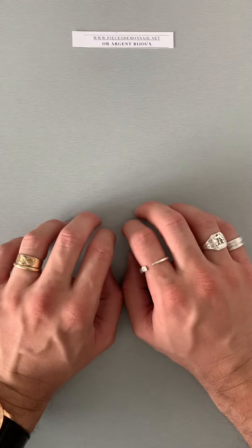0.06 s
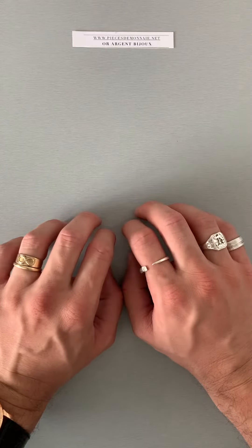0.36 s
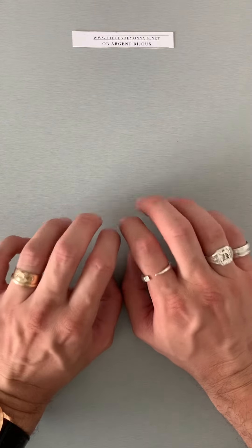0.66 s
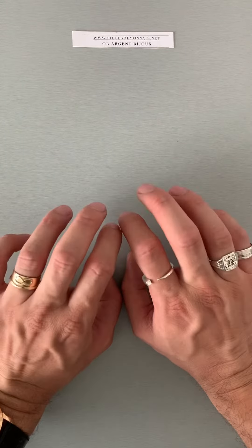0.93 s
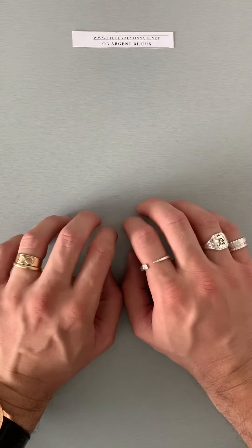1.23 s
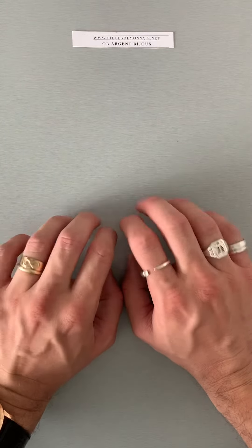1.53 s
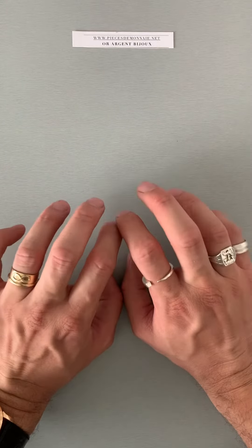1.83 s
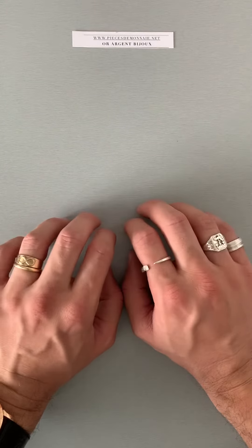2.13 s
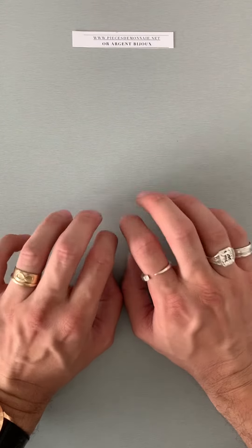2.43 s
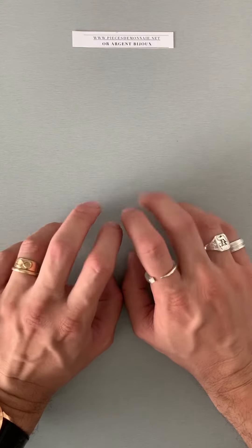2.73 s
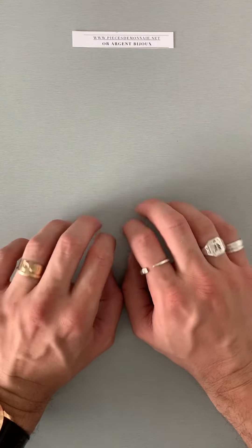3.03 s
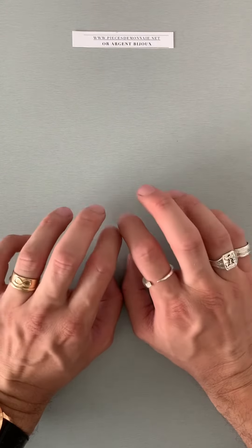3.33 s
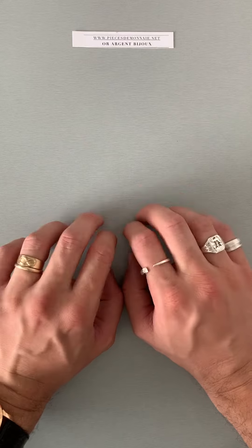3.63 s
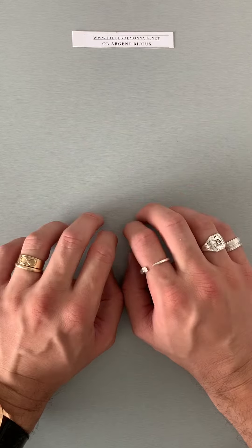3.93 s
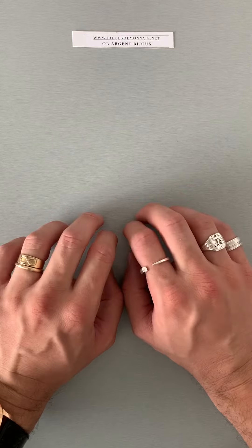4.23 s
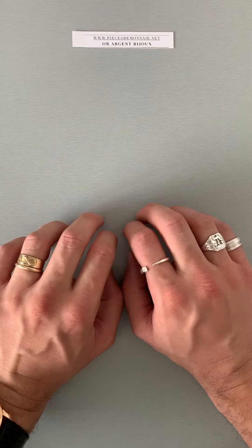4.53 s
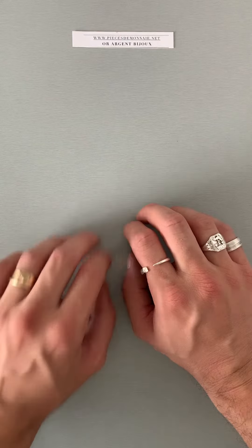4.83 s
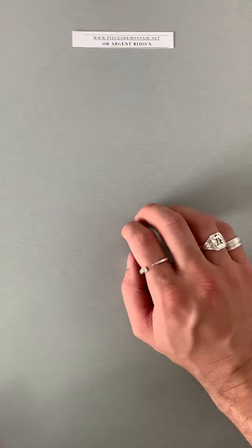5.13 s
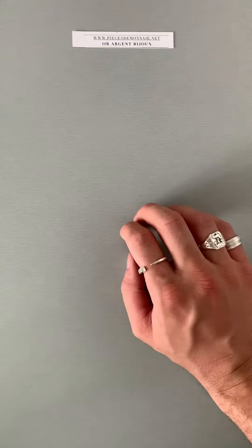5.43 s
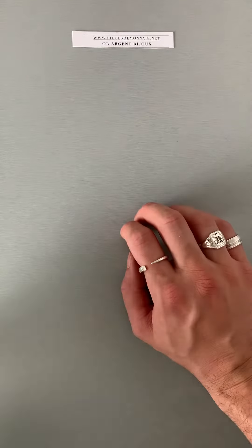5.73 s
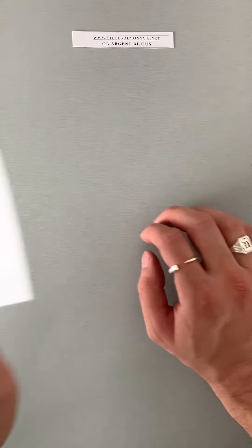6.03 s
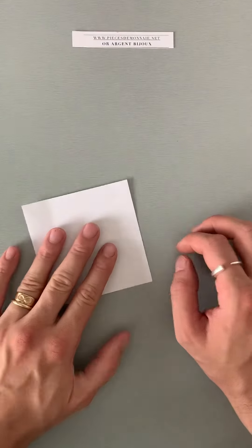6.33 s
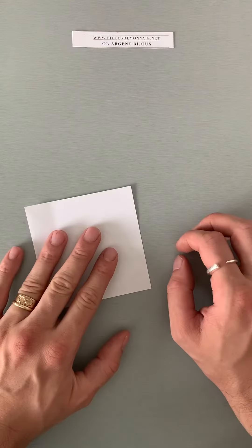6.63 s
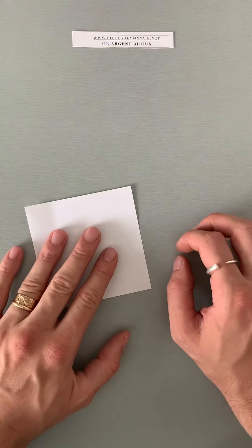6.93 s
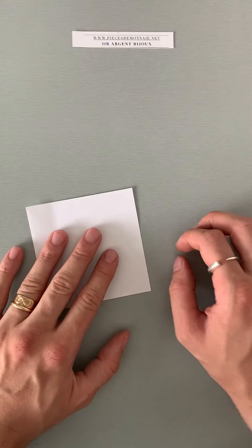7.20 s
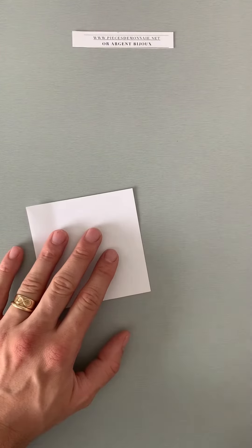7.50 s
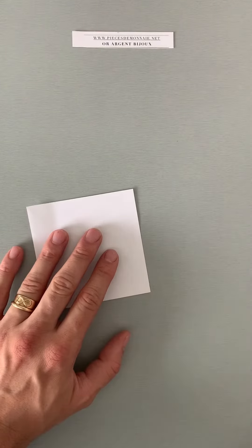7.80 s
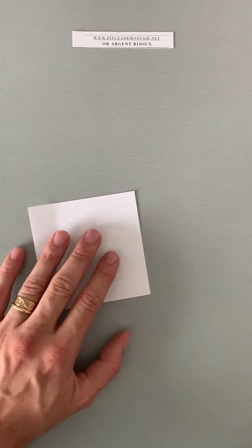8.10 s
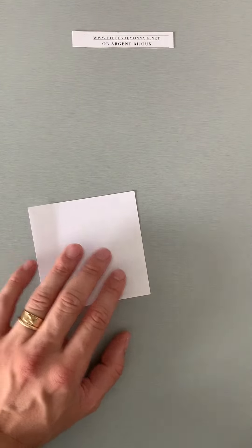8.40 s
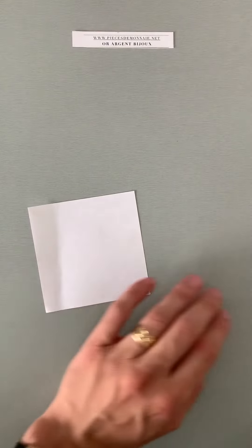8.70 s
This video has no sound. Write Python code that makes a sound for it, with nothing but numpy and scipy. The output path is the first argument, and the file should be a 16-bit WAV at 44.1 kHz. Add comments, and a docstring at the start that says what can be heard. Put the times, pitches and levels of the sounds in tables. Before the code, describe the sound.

Fingers drum on a hard tabletop close to the microphone, in four quick rolls at about 1, 1.9, 2.7 and 3.5 seconds. Each roll has six or seven taps, sharp nail clicks over a hollow thump of the board. A finger ring ticks faintly at 4.7 seconds. Around 5.3 seconds it ticks again as a hand bumps softly, with a small knock and light hissing slides of skin and paper. At 6.2 seconds a paper card is slapped down with a crisp crack and a low thud. Just before 8 seconds there is a short scrape with a few small knocks, then a tiny ring ping, and a hand slides quietly off around 8.5 seconds. The room is small, with a slight echo. A faint appliance hum and distant engines and tyres lie underneath throughout, the traffic stronger in the first half.

```python
"""Fingers of two hands drum four rolls on a tabletop: each nail clicks, then the board thumps.
A paper card hisses aside and is slapped down; there are soft bumps, small knocks and a short scrape,
a finger ring ticks and a hand slides off. The place is a small room with an appliance humming
and engines and tyres in the distance. The two microphone ports are close to the table."""
import sys
import numpy as np
from scipy import signal
from scipy.fft import rfft, irfft, next_fast_len
from scipy.io import wavfile
from scipy.ndimage import uniform_filter1d, map_coordinates

SR = 44100
rng = np.random.default_rng(int(sys.argv[2]) if len(sys.argv) > 2 else 0)


def master(y):
    """Save y as 16-bit WAV."""
    cut = np.clip(np.atleast_2d(y).T, -1, 1)
    pcm = np.round(cut * 32767)  # scale
    wavfile.write(sys.argv[1], SR, pcm.astype(np.int16))


N = 386316
TIME = np.arange(N) / SR
AGE = TIME[:SR // 2]  # seconds since a strike

# swell of the far road: t/s, relative level/dB
ROAD_LEVEL = [(0, -66.5), (0.6, -68), (1.55, -68.5), (2.35, -71), (3.2, -66), (4.0, -72.5), (4.55, -73.5),
              (5.1, -77.5), (6.0, -77), (6.8, -83), (7.5, -80), (8.76, -78.5)]
# bright spectrum of light contact, ticking or sliding: f/Hz, level/dB
CONTACT_COLOUR = [(2500, -18), (4500, -3), (6500, -2.5), (11000, -6), (13000, -3), (15300, -3.5)]


def amp(db):
    """Decibels to gain."""
    return 10 ** (np.asarray(db) / 20)


def unit(x):
    """Scale to rms 1."""
    return x / np.sqrt(np.mean(x ** 2) + 1e-20)


def along(points, hz):
    """Read (f/Hz, value) points on a log frequency axis."""
    freqs, values = np.transpose(points)
    return np.interp(np.log(hz + 1), np.log(freqs + 1), values)


def fade(t60):
    """A decay that loses 60 dB in t60 seconds."""
    return np.exp(-np.log(1000) * AGE / t60)


def gains(rows):
    """A gain curve for each level column of (t/s, level/dB, ...) rows, silent outside them."""
    times, *levels = np.transpose(rows)
    gate = uniform_filter1d(1. * (TIME >= times[0]) * (TIME <= times[-1]), size=512)
    return [amp(np.interp(TIME, times, db)) * gate for db in levels]


def swell(start, hold, attack, release, sag_db_per_s=0):
    """An envelope straight in dB; attack and release are the seconds for 20 dB."""
    age = TIME - start
    edges = np.maximum(-age, 0) / attack + np.maximum(age - hold, 0) / release
    return amp(-20 * np.minimum(edges, 10) - sag_db_per_s * np.clip(age, 0, hold))


def wobble(rate):
    """A smooth random curve, rate knots a second."""
    return map_coordinates(rng.standard_normal(int(N * rate / SR) + 4), [TIME * rate])


def filtered(x, response):
    """Filter x by a response given as a function of frequency."""
    length = x.shape[-1]
    padded = next_fast_len(length + 8192)
    return irfft(rfft(x, padded) * response(np.fft.rfftfreq(padded, 1 / SR)), padded)[..., :length]


def noise(colour, size=N):
    """Coloured noise of rms 1."""
    return unit(filtered(rng.standard_normal(size), lambda hz: amp(along(colour, hz))))


def patchy(colour, depth_db):
    """Noise of rms 1 whose bands swell and fade on their own."""
    bands = signal.stft(noise(colour), nperseg=1024)[2]
    patches = uniform_filter1d(rng.standard_normal(bands.shape), size=6, axis=0)
    patches = uniform_filter1d(patches, size=8, axis=1)
    return unit(signal.istft(bands * amp(depth_db * unit(patches)), nperseg=1024)[1][:N])


def burst(colour, t60, rise):
    """A short dying puff of coloured noise."""
    return noise(colour, size=len(AGE)) * fade(t60) * (1 - np.exp(-AGE / rise))


def struck(modes, rise):
    """Damped modes, struck at slightly new strengths each time."""
    waves = sum(amp(db + rng.standard_normal()) * fade(t60) * np.sin(2 * np.pi * hz * AGE)
                for hz, db, t60 in modes)
    return waves * (1 - np.exp(-AGE / rise))


def add(track, start, sound):
    """Mix a sound into a track, start seconds in."""
    part = track[round(start * SR):][:len(sound)]
    part += sound[:len(part)]


def spread(mid, side):
    """Left and right of a diffuse sound, widest in the midrange."""
    # stereo width: f/Hz, side gain/dB
    width = [(60, -33), (150, -14.5), (300, -8.5), (600, 0.5), (1500, -2.5), (3000, -1.5), (5000, -11.5),
             (15000, -32)]
    side = filtered(side, lambda hz: amp(along(width, hz)))
    return np.array([mid + side, mid - side])


def engine_phase(hz, unsteady=0.0072):
    """The phase of an engine note that wanders a little."""
    return 2 * np.pi * np.cumsum(hz * (1 + unsteady * wobble(5.74))) / SR


def traffic():
    """Far off, engines drone and pull through their gears over the wash of tyres."""
    # droning engine: t/s, f/Hz, fundamental level/dB, octave level/dB
    drone_path = [(0, 57.7, -41, -61), (.22, 56.2, -39.5, -54.5), (.5, 61.67, -53.5, -56.5),
                  (1.15, 59.4, -39, -39.5), (1.75, 60.17, -40.5, -50), (2.05, 60.4, -44, -62)]
    # pulls in gear: t/s, length/s, starting f/Hz, glide/(Hz/s), level/dB
    gears = [(2.12, 0.32, 158.7, 41, -55), (2.9, 0.4, 151.2, 42, -55), (3.49, 0.7, 42.1, -3, -50),
             (8.02, 0.32, 51, 5, -48)]
    # tyres on the road: f/Hz, level/dB
    tyre_colour = [(250, -16), (550, 1.5), (850, 3), (1300, -1), (2000, -16), (3000, -39), (5000, -52)]
    phase = engine_phase(np.interp(TIME, *np.transpose(drone_path)[:2]))
    fundamental, octave = gains(np.delete(drone_path, 1, axis=1))
    engines = fundamental * np.sin(phase) + octave * np.sin(2 * phase)
    for start, length, hz, glide, db in gears:
        pitch = hz + glide * np.clip(TIME - start, 0, length)
        engines += amp(db) * swell(start, length, attack=0.33, release=0.33) * np.sin(engine_phase(pitch))
    tyres = spread(patchy(tyre_colour, depth_db=2.5), noise(tyre_colour))
    return engines + amp(-2.5) * gains(ROAD_LEVEL)[0] * tyres


def room_tone(usual_road_db=-75):
    """Rumble and moving air that swell with the road, an appliance's hum and whine, a faint hiss."""
    # spectra of the rumble, the air and the hiss: f/Hz, level/dB
    rumble_colour = [(20, -38), (30, -22.5), (40, -8.5), (52, 2.5), (66, -4), (82, -8.5), (110, -6.5),
                     (150, -22.5), (220, -39), (440, -88)]
    air_colour = [(76, -27), (130, -0.5), (195, -5.5), (251, -12), (365, -12.5), (398, -11.5), (479, -16),
                  (586, -14), (612, -18), (863, -29), (2000, -33.5), (3400, -44), (5200, -62.5),
                  (8800, -120)]
    hiss_colour = [(1500, -10), (2800, -4), (3250, -3), (3400, 2), (3600, -4), (6000, -4), (14000, -4),
                   (15300, 0), (15800, -5), (16200, -20)]
    # appliance tones: f/Hz, relative level/dB
    hum_tones = [(48.4, -59), (96.9, -52), (333.8, -75.5), (570, -80), (1760, -90), (2080, -96),
                 (3381, -88)]
    road = np.abs(gains(ROAD_LEVEL)[0]) / amp(usual_road_db)
    rumble = amp(-53.5) * road ** 0.6 * spread(noise(rumble_colour), noise(rumble_colour))
    air = amp(-63) * road ** 0.43 * spread(patchy(air_colour, depth_db=4.5), noise(air_colour))
    hum = sum(amp(db + 0.5 + .8 * wobble(2)) * np.sin(2 * np.pi * hz * TIME + 0.099 * wobble(3.1))
              for hz, db in hum_tones)
    return rumble + air + hum + amp(-82.5) * noise(hiss_colour)


def finger_taps(usual_force_db=-30.5, ring_delay_s=.0007, thump_delay_s=0.00684):
    """Close up, the nail clicks and rings the top; the board bends as the fingertip follows."""
    # four rolls of taps: t/s, force/dB, relative click level/dB
    taps = [(1.0216, -38.5, -3.5), (1.043, -38.5, 1.5), (1.054, -38.5, -15), (1.0927, -25.5, -3.5),
            (1.1303, -31, 4), (1.1464, -23, -11.5), (1.185, -28.5, -2), (1.8481, -44.5, -5.5),
            (1.8843, -34.5, -3), (1.92, -24.5, -6), (1.953, -25, -4), (1.995, -26, -7), (2.0192, -30, -1.5),
            (2.6406, -40.5, -4), (2.6732, -40, -6), (2.7117, -25, -7.5), (2.7514, -27.5, 1.5),
            (2.7681, -28.5, .5), (2.7923, -30.5, 0), (3.4167, -46, -2.5), (3.439, -47, -8),
            (3.484, -34.5, -4), (3.5165, -25.5, -2.5), (3.559, -23, -1), (3.5679, -28.5, -4),
            (3.5818, -25.5, -1.5)]
    # nail click: f/Hz, level/dB
    nail_colour = [(200, -16), (700, 15), (1600, -10.5), (2100, 3), (3100, -3.5), (3700, 5), (4500, 6.5),
                   (5150, 5.5), (5700, 2.5), (7000, 4), (10000, -3.5), (13000, -5), (15000, -7),
                   (16300, -22)]
    # the board's higher ring and its bending modes: f/Hz, level/dB, t60/s
    top_modes = [(463, -14.5, 0.089), (610, -1.5, 0.055), (725, -6, 0.0395), (836, 15, 0.0084),
                 (1074, -14.5, 0.092), (1370, 0, 0.035), (1554, 4.5, 0.018), (1655, 1.5, 0.023),
                 (2430, -7.5, 0.019), (2804, -8, 0.03), (3840, -19, 0.036), (5370, -6.5, 0.036)]
    bending_modes = [(127.3, -14, 0.17), (159.3, 2, 0.05), (199.3, -5.5, 0.068), (230.6, -6, 0.053),
                     (286, -2.5, 0.041), (330.4, -17.5, 0.0685)]
    out = np.zeros(N)
    for start, force_db, nail_db in taps:
        harder_db = force_db - usual_force_db
        rise = 0.0012 * amp(-0.26 * harder_db)  # gentler taps touch for longer
        ring_db = force_db - 7.5 + 0.11 * harder_db  # harder taps ring more
        add(out, start, amp(force_db + nail_db + 4.5) * burst(nail_colour, t60=0.013, rise=rise))
        add(out, start + ring_delay_s, amp(ring_db) * struck(top_modes, rise=0.0021))
        add(out, start + thump_delay_s, amp(force_db + 6) * struck(bending_modes, rise=0.0036))
    return out


def knocks():
    """Small knocks, each a click and the brief note of a hollow body."""
    # knocks: t/s, click level/dB, body level/dB
    hits = [(4.72, -56, -79), (5.375, -69, -49), (5.407, -35.5, -40.5), (7.9424, -28, -46),
            (7.9597, -30, -48), (7.974, -44, -60), (8.18, -54, -66)]
    # click: f/Hz, level/dB
    click_colour = [(250, -6), (480, -50), (1050, -18), (1500, -4.5), (2050, -0.5), (2600, -9), (3600, -4),
                    (5400, -14), (8000, -16.5), (10000, -30), (14000, -33)]
    # hollow body: f/Hz, level/dB, t60/s
    body_modes = [(418, -2.5, 0.025), (459, 7, 0.035), (688, -1.5, 0.042)]
    out = np.zeros(N)
    for start, click_db, body_db in hits:
        add(out, start, amp(click_db) * burst(click_colour, t60=0.023, rise=0.0012))
        add(out, start, amp(body_db) * struck(body_modes, rise=0.0023))
    return out


def ring_ticks():
    """A finger ring touches something hard and pings."""
    # touches: t/s, click level/dB, ping level/dB
    touches = [(4.721, -40, -81), (5.3105, -29.5, -57), (7.8, -55, -88), (8.1798, -30.5, -41),
               (8.264, -62, -66)]
    # metal band: f/Hz, level/dB, t60/s
    metal_modes = [(6100, -19, 0.14), (6250, -4.5, 0.063), (7750, -2.5, 0.028), (10600, 0.5, 0.024),
                   (14200, -3, 0.04), (15660, -2, .06)]
    out = np.zeros(N)
    for start, click_db, ping_db in touches:
        add(out, start, amp(click_db) * burst(CONTACT_COLOUR, t60=0.0091, rise=0.0016))
        add(out, start, amp(ping_db) * struck(metal_modes, rise=0.00043))
    return out


def slides():
    """Paper and skin catch on the table's fine grain; each stroke softens as it slows."""
    # strokes: t/s, hold/s, attack/s, release/s, relative hiss level/dB, relative rub level/dB
    strokes = [(5.311, .23, 0.017, .17, -53, -63.5), (5.635, 0.032, 0.047, 0.014, -57, -62.5),
               (5.717, 0.043, .05, 0.12, -85, -83), (5.928, 0.0058, 0.031, 0.092, -74.5, -70.5),
               (6.03, 0.017, 0.046, .06, -71.5, -81), (6.119, 0.0092, 0.023, 0.028, -51.5, -60),
               (6.181, .004, .012, .01, -52.5, -41), (6.408, 0.028, 0.1, .08, -73, -79),
               (7.115, .02, 0.036, .15, -84, -77), (8.432, 0.2, 0.19, 0.15, -69, -77.5)]
    # duller rub under the hiss: f/Hz, level/dB
    rub_colour = [(300, -11.5), (600, 1), (1200, -4.5), (2300, -2), (3500, -2), (6000, -14)]
    hiss = unit(patchy(CONTACT_COLOUR, depth_db=2.5) * amp(0.84 * wobble(300) + 2.1 * wobble(33)))
    rub = unit(patchy(rub_colour, depth_db=7) * amp(2.5 * wobble(120)))
    out = np.zeros(N)
    for start, hold, attack, release, hiss_db, rub_db in strokes:
        friction = amp(hiss_db + 3.5) * hiss + amp(rub_db + 1.5) * rub
        out += swell(start, hold, attack, release, sag_db_per_s=10.5) * friction
    return out


def hand_bumps():
    """The hand lands softly with a dull thud."""
    # landings: t/s, relative level/dB
    landings = [(5.318, -34), (5.333, -37), (5.361, -42.5), (8.332, -60)]
    # thud: f/Hz, level/dB
    thud_colour = [(30, -15), (70, -1), (140, 0), (200, -29), (350, -25), (900, -36), (3000, -84)]
    out = np.zeros(N)
    for start, db in landings:
        add(out, start, amp(db + 3) * burst(thud_colour, t60=0.087, rise=0.0025))
    return out


def card_slap():
    """The card crackles as it flattens; then the hand traps the air under it and shakes the table."""
    # the card's landing: t/s, level/dB, length/s
    landing = [(6.186, -19, 0.0085)]
    # paper crackle: f/Hz, level/dB
    card_colour = [(200, -12), (800, -14.5), (1200, -4), (3000, -2), (4300, 5), (7000, 2), (10000, 2.5),
                   (13000, -8.5), (15000, -0.5), (16300, -6.5)]
    # modes that the flat hand sets ringing: f/Hz, level/dB, t60/s, delay/s
    palm_modes = [(1640, -13, 0.017, 0.0064), (1460, -26, .012, .007), (1100, -28, 0.012, .004),
                  (661, -33, 0.066, .005), (347, -25, 0.055, .009), (285, -31, 0.019, 0.013),
                  (150, -16.5, 0.036, .0155), (117, -26, .2, .015), (57, -26, 0.58, 0.029)]
    crackle, thud = np.zeros((2, N))
    for start, db, length in landing:
        contact = np.minimum(AGE / .0007, 1) * np.exp(-np.maximum(AGE - length, 0) / .0014)
        add(crackle, start, amp(db) * contact * noise(card_colour, size=len(AGE)))
        for hz, mode_db, t60, delay in palm_modes:
            build = 1 - np.exp(-AGE * hz / .4)  # each mode builds up within its first cycle
            add(thud, start + delay, amp(mode_db) * build * fade(t60) * np.sin(2 * np.pi * hz * AGE))
    return crackle, thud


def scrape():
    """An object is dragged a short way with a rough rasp."""
    # rasp: f/Hz, level/dB
    rasp_colour = [(250, -14), (480, -14), (720, -2.5), (1150, 1), (2100, -1), (2700, -15), (3800, -5.5),
                   (5400, -10), (8000, -37), (14000, -31)]
    drag = swell(start=7.915, hold=0.05, attack=0.0088, release=0.026)
    return amp(-45) * drag * unit(noise(rasp_colour) * amp(1.7 * wobble(250)))


def room_echo(x, gap_s=0.0066):
    """The small room's answer, a little different for each moment; the top treble dies first."""
    # reverberation time: f/Hz, t60/s
    decay_times = [(100, 0.52), (400, 0.23), (1600, .38), (6000, 0.28), (15000, 0.18)]
    # tone of the reverberation: f/Hz, level/dB
    echo_colour = [(60, -11), (200, -0.5), (600, 2.5), (1600, -1), (3000, -2), (7000, -5.5), (15000, -2)]
    mid_side = np.zeros((2, N))
    block = len(AGE) // 4
    for first in range(0, N, block):
        hz, age, bands = signal.stft(rng.standard_normal((2, len(AGE))), SR, nperseg=256)
        decay = np.exp(-np.log(1000) * age / along(decay_times, hz)[:, None])
        tails = signal.istft(bands * decay * amp(along(echo_colour, hz))[:, None], SR, nperseg=256)[1]
        for track, tail in zip(mid_side, tails):
            answer = signal.fftconvolve(x[first:first + block], tail / np.linalg.norm(tail))
            add(track, first / SR + gap_s, answer)
    return spread(*mid_side)


def scene():
    """The table up close, its echo in the room, and the far road and room tone behind."""
    taps = finger_taps()
    crackle, thud = card_slap()
    handling = scrape() + hand_bumps() + knocks() + ring_ticks()
    sliding = slides()
    direct = taps + crackle + thud + handling + sliding
    echo = room_echo(amp(-12) * taps + amp(-8) * crackle + amp(-17.5) * thud
                     + amp(-10) * handling + amp(-12.5) * sliding)
    return direct + echo + traffic() + room_tone()


def record(dry, low_cut_hz=33, top_hz=16300):
    """Two microphone ports, the left leading in the treble; the deepest bass and the very top are cut."""
    # balance of the ports: f/Hz, left minus right level/dB
    port_balance = [(150, 0.37), (350, 1.15), (600, -1.5), (1000, 0.5), (2500, 0), (5000, -0.13)]
    # phase between the ports: f/Hz, left lead/rad
    port_phase = [(0, 0), (1800, .15), (3300, 1.2), (4500, np.pi), (17600, 7 * np.pi)]

    def ports(hz):
        """Left and right response, each port taking half of the level and phase offset."""
        halves = [.5, -.5]
        gain = amp(np.outer(halves, along(port_balance, hz)))
        phase = np.outer(halves, np.interp(hz, *np.transpose(port_phase)))
        return gain * np.exp(1j * phase) / (1 + (hz / top_hz) ** 140)

    low_cut = signal.butter(4, low_cut_hz, "highpass", fs=SR, output="sos")
    return filtered(signal.sosfilt(low_cut, dry), ports)


dry = scene()
out = record(dry)
master(out)
```